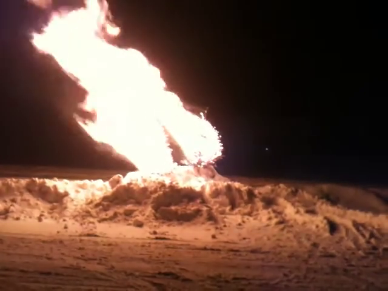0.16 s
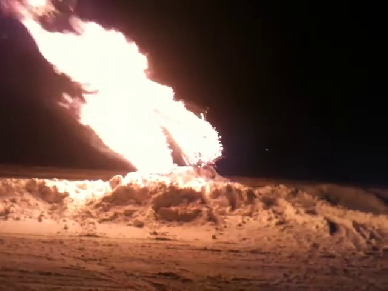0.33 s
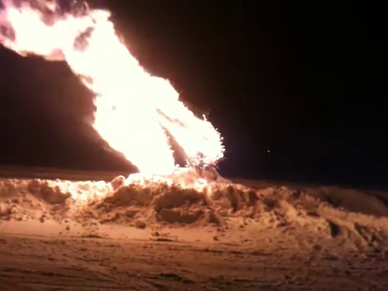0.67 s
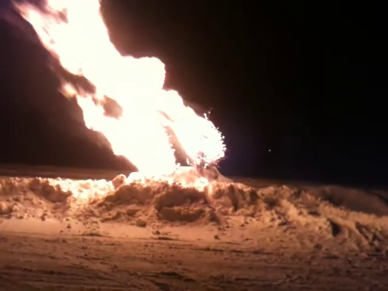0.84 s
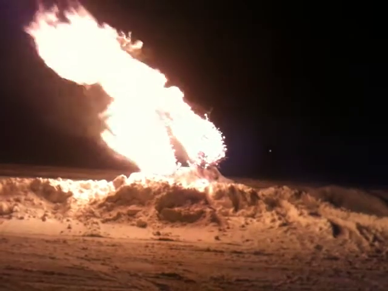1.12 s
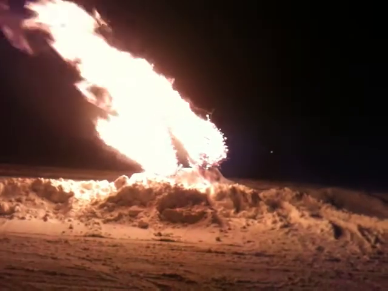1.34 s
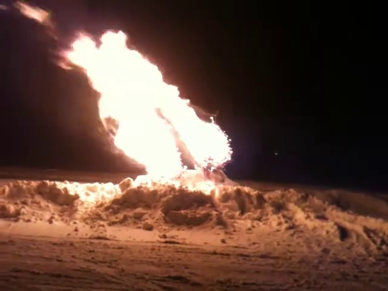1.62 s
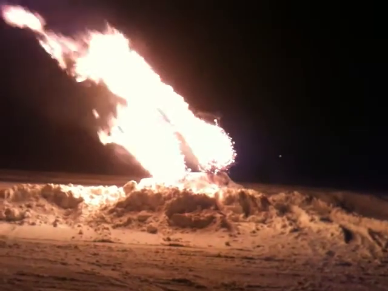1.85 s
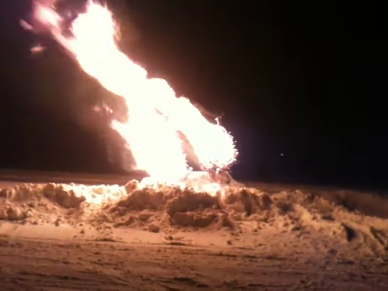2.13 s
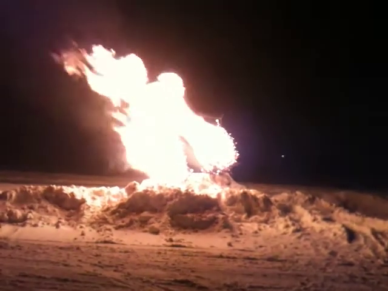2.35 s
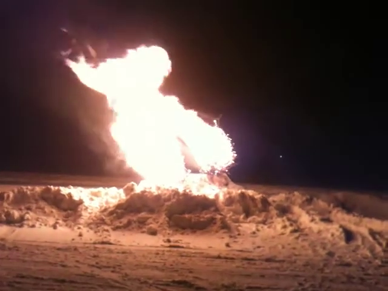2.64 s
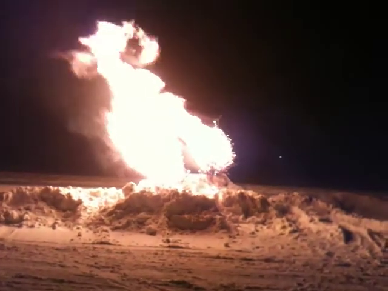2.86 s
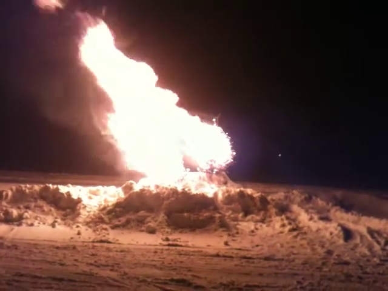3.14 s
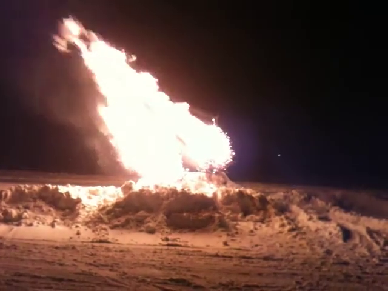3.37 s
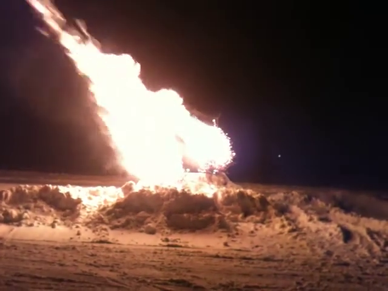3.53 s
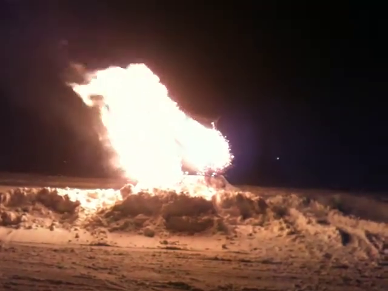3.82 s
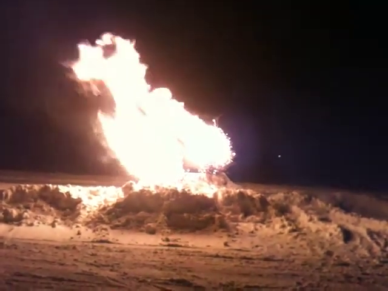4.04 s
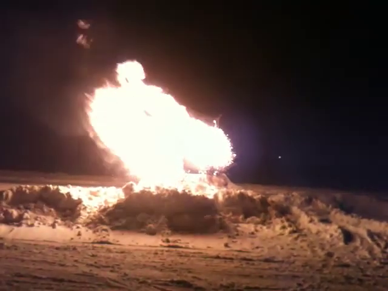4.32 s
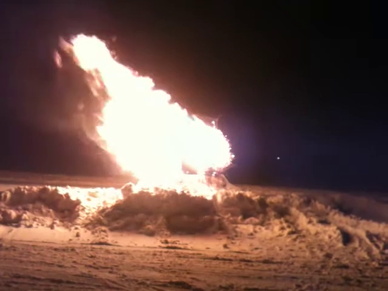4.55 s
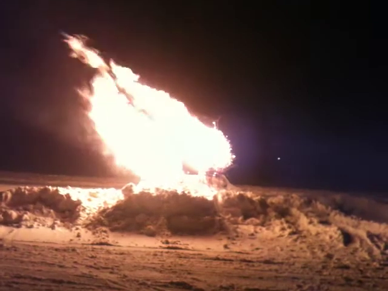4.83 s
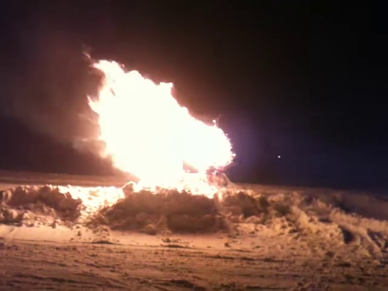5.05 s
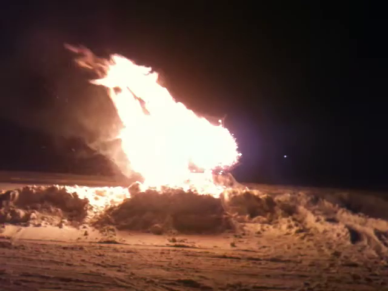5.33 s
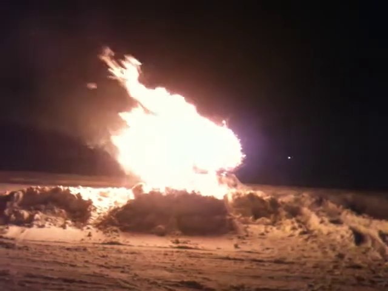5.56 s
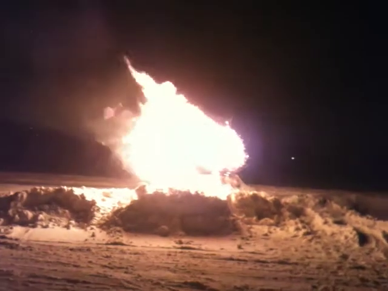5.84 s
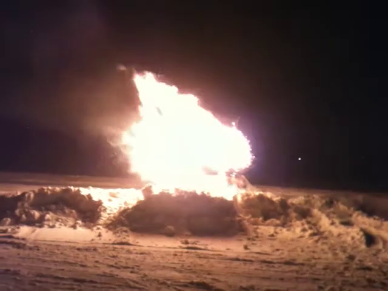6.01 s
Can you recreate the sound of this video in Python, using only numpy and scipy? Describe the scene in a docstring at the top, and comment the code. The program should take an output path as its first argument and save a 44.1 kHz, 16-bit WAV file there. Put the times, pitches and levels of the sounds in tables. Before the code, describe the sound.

A pile of conifer trees burns some way off on an open, snowy field. For the whole six seconds, the main sound is a bright, spitting sizzle of burning needles, wavering in small flurries and easing only slightly toward the end. It flares briefly at the very start and around 1.7, 4.2 and 5.4 seconds. Thin twigs snap sharply many times a second, the loudest near 0.4 seconds. Thicker branches crack with dry, woody pops, three in the opening moment and others around 1.7, 2.4, 3.2, 3.5 and 4.4 seconds. Well underneath, the flames flutter and roar softly, swelling near 0.4, 0.7, 1.7, 3 and 4.8 seconds, along with a faint, deep rumble of wind on the microphone. At about 3.6 seconds a pocket of gas flares with one soft, low puff that trails into the roar. The sound is dry and outdoors, still crackling at the end.

```python
"""A bright, spitting sizzle: a pile of conifer trees ablaze some way off, on a snowy field at night.
Needles burst by the thousand in small flurries and merge into that sizzle. Branches crack and twigs
snap out of it, each doubled by its bounce off the ground. Underneath, the flames flutter and roar
softly over a faint, deep rumble of wind on the microphone. A little past halfway a pocket of gas
flares with one low puff."""
import sys
import numpy as np
from scipy import signal
from scipy.fft import rfft, irfft, next_fast_len
from scipy.io import wavfile
from scipy.ndimage import uniform_filter1d

SR = 44100
rng = np.random.default_rng(int(sys.argv[2]) if len(sys.argv) > 2 else 0)


def transcribe(signal):
    """Save signal, clipped to [-1, 1], as a 16-bit WAV file at the path in sys.argv[1]."""
    frames = np.atleast_2d(signal).T
    limited = np.clip(frames, -1, 1)
    pcm = np.round(limited * 32767).astype(np.int16)
    wavfile.write(sys.argv[1], SR, pcm)


N = 272535

# How fiercely the needles burn. Each row: time in seconds, relative level in dB.
SIZZLE_FADER = [(0.0, -39.5), (0.28, -39.5), (0.45, -40), (0.55, -40.5), (1.0, -40.5), (1.55, -39.5),
                (1.85, -40), (2.02, -42.5), (2.12, -41), (2.3, -39), (2.85, -40), (3.33, -40.5),
                (3.45, -44), (3.54, -41.5), (4.0, -39), (4.13, -42.5), (4.22, -37.5), (4.34, -39),
                (4.5, -39.5), (4.76, -43), (4.86, -40.5), (5.37, -41.5), (5.49, -44), (5.67, -41),
                (6.0, -40), (6.18, -44.5)]
# Boughs catching all at once. Each row: start in seconds, length in seconds, lift of the sizzle in dB.
BOUGH_FLARES = [(0.023, 0.03, 5.5), (0.365, 0.095, 1), (1.645, 0.1, 2.1), (4.156, 0.046, 4.5),
                (4.27, 0.031, 2), (4.465, 0.041, 1), (5.375, 0.035, 4)]
# The bright tone of needles and twigs. Each row: frequency in Hz, gain in dB.
CRACKLE_EQ = [(60, -39), (300, -28), (900, -26), (2400, -15), (2800, -21), (3120, -14), (3380, -16),
              (3800, -8), (4250, -10.5), (4650, -8), (5200, -13.5), (6200, -3.5), (7200, 0), (8700, -3),
              (9700, -0.5), (10900, -5), (12000, -4), (13700, -11), (15100, -9.5)]

# The rides on the flames' low roar and airy rush. Each row: time in seconds, relative level in dB.
ROAR_FADER = [(0.0, -64), (0.65, -66), (1.2, -64.5), (2.5, -66), (3.45, -66), (4.1, -65), (5.5, -65),
              (6.18, -66.5)]
RUSH_FADER = [(0.0, -58), (1.17, -60), (2.16, -59.5), (3.42, -61.5), (4.59, -60.0), (4.86, -60.5),
              (5.13, -63), (6.17, -62)]
# Tongues of flame tearing off. Each row: start in seconds, length in seconds, lift of the roar in dB.
FLAME_SURGES = [(0.39, 0.08, 4.5), (0.73, 0.12, 4.6), (1.03, 0.046, 2), (1.36, 0.068, 3.5),
                (1.66, 0.093, 5), (1.86, 0.048, 2), (2.63, 0.06, 2), (2.97, 0.063, 4.5), (3.11, 0.045, 5),
                (3.96, 0.08, 1.5), (4.47, 0.05, 1), (4.8, 0.046, 4), (5.03, 0.07, -0.5), (5.65, 0.11, 3)]
# The flames' warm roar and midrange rush. Each row: frequency in Hz, gain in dB.
ROAR_EQ = [(15, -60), (40, -46), (58, -24), (85, -13.5), (130, -5.5), (175, -0.5), (230, -4.5), (330, -14),
           (600, -35)]
RUSH_EQ = [(50, -39), (150, -15), (400, -3), (640, 4), (950, -1.5), (1300, -4.5), (1750, 0.5), (2080, -8.5),
           (2450, -1.5), (2780, -10), (3100, -5.5), (3500, -12), (8000, -20.5)]
# The deep rumble of wind on the microphone. Each row: frequency in Hz, gain in dB.
WIND_EQ = [(15, 4), (45, 3), (70, 7), (130, -14)]

# Thick branches cracking. Each row: start in seconds, relative levels of the woody body and of the
# bright edge in dB, pitch in Hz, ring from 0 (dry click) to 1 (pitched tick).
BRANCH_CRACKS = [(0.0252, -47.5, -34, 2200, .2), (0.1734, -42, -36, 3200, .1), (0.2521, -45, -34, 800, .2),
                 (1.4603, -51, -34, 2500, .1), (1.7035, -48.5, -30.3, 3900, .2),
                 (2.0935, -41, -40, 4200, .75), (2.4038, -49, -34.5, 3900, .2),
                 (3.1607, -46.5, -34, 3500, .3), (3.5213, -45, -34, 2800, .25),
                 (4.3756, -42.5, -32.5, 4500, .1), (4.8962, -48.5, -41, 2900, .35),
                 (5.0545, -51, -35, 2200, .2), (5.346, -45.5, -41, 4300, .75),
                 (5.5602, -50, -37, 2300, .25), (6.1087, -48, -42, 3600, .7)]
# A crack's woody body and splintery edge. Each row: frequency in Hz, gain in dB.
WOOD_EQ = [(60, -35), (300, -12), (700, 2), (1100, 0.5), (1600, 7.5), (2400, 4), (3150, 2.5), (4400, 7),
           (5400, -1.5), (15000, -27)]
SPLINTER_EQ = [(1500, -37), (3200, -11), (4000, 1), (5200, -10), (7000, 6), (12000, -1), (15000, -12)]
# The loudest twigs snapping. Each row: start in seconds, relative level in dB, pitch in Hz, ring 0 to 1.
TWIG_SNAPS = [(0.0746, -33, 10000, .4), (0.112, -32, 9400, .4), (0.3756, -24.7, 7200, .25),
              (0.4228, -32.5, 7300, .4), (0.4377, -33.5, 8300, .3), (0.6254, -33.5, 9200, .4),
              (0.7003, -33.5, 8000, .5), (0.745, -33.5, 8300, .5), (0.8785, -34, 7500, .5),
              (0.8921, -32.2, 8700, .6), (0.9962, -33, 7900, .5), (1.0676, -33, 6600, .4),
              (1.2916, -33, 8300, .2), (1.3504, -33, 7900, .4), (1.374, -31, 8900, .5),
              (1.6578, -31, 6500, .3), (1.6755, -33, 9800, .5), (1.7001, -29.8, 6900, .2),
              (1.9101, -27.8, 9600, .4), (2.2718, -27.7, 7600, .3), (2.3568, -30.8, 9900, .2),
              (2.3843, -29.4, 9700, .6), (2.4328, -27.3, 9700, .5), (2.5402, -33, 7500, .4),
              (2.6395, -33.5, 7000, .4), (2.7548, -28, 6700, .25), (3.0206, -32.5, 10100, .4),
              (3.0325, -30.6, 9900, .35), (3.3472, -28.3, 6800, .6), (3.5848, -33, 8500, .4),
              (3.7074, -28.5, 9400, .6), (3.8867, -33, 7200, .5), (4.1262, -28, 10200, .45),
              (4.1948, -31, 7600, .6), (4.2144, -33, 7000, .3), (4.2978, -30, 7100, .45),
              (4.4749, -32.3, 7400, .5), (4.5056, -27.2, 9600, .45), (4.6918, -34, 7300, .5),
              (4.8025, -29.3, 7300, .35), (5.1051, -29.7, 9600, .45), (5.1837, -33.5, 7000, .4),
              (5.3084, -32, 7200, .4), (5.3817, -31.3, 10000, .7), (5.755, -33, 8500, .4),
              (5.841, -32, 7100, .7), (6.044, -31.5, 9200, .65), (6.074, -33, 7400, .5),
              (6.1085, -29, 7100, .9), (6.116, -34.5, 7500, .7), (6.125, -35, 7700, .5)]

GROUND_ECHO_S, GROUND_ECHO_DB = .0015, -8.5


def from_db(db):
    """Decibels to gain."""
    return 10 ** (np.asarray(db) / 20)


def rms_one(x):
    """Scale to an rms of 1."""
    return x / np.sqrt(np.mean(x ** 2) + 1e-20)


def ride(fader):
    """A fader's level in dB at every sample."""
    return np.interp(np.arange(N) / SR, *np.transpose(fader))


def swells(rows, ramp_s=0.048):
    """A bough or a tongue of flame blazes and dies back: dB on top of the steady burning."""
    t = np.arange(N) / SR
    return sum(db * np.clip(.5 + np.minimum(t - s, s + length_s - t) / ramp_s, 0, 1)
               for s, length_s, db in rows)


def equalise(x, curve):
    """Minimum-phase EQ: colours a click without smearing anything ahead of its attack."""
    size = 2 * next_fast_len(len(x))
    hz, db = np.transpose(curve)
    bins = np.maximum(np.arange(size // 2 + 1) * SR / size, 1)
    gain = from_db(np.interp(np.log(bins), np.log(hz), db))
    cepstrum = irfft(np.log(gain))
    cepstrum[1:size // 2] *= 2
    cepstrum[size // 2 + 1:] = 0
    return irfft(rfft(x, size) * np.exp(rfft(cepstrum)))[:len(x)]


def resonance(x, hz, width_hz):
    """One resonant band with a gain of 1 at its peak."""
    r = np.exp(-np.pi * width_hz / SR)
    feedback = [1, -2 * r * np.cos(2 * np.pi * hz / SR), r * r]
    return signal.lfilter(np.array([1, 0, -1]) * (1 - r * r) / 2, feedback, x + 1e-18)


def sputters(per_s, size_db, size_cap, t60):
    """The flurries in the sizzle, as a gain: sprigs catch at random, flare at once and die quickly."""
    caught = rng.random(N) < per_s / SR
    catches = caught * from_db(size_db * np.minimum(rng.exponential(1, N), size_cap))
    power_decay = from_db(-60 / (t60 * SR)) ** 2
    return np.sqrt(1 + signal.lfilter([1], [1, -power_decay], catches ** 2 + 1e-18))


def needles(flurries, per_s, size_db, size_cap, width_hz, click_share, hiss_db, pitches=24):
    """Resin pockets burst, each a click with a brief high ring; together they sizzle."""
    born = rng.random(N) < per_s / SR
    sizes = from_db(size_db * np.minimum(rng.exponential(1, N), size_cap))
    bursts = born * flurries * sizes * rng.choice([-1, 1], N)
    pitch_index = rng.integers(0, pitches, N)
    # bursts at all heights of the pile: every ground echo has its own delay
    echo_at = np.arange(N) + (GROUND_ECHO_S * SR * rng.uniform(.5, 2, N)).astype(int)
    crackle = np.zeros(N)
    for k, hz in enumerate(np.linspace(3500, 15500, pitches)):
        clicks = bursts * (pitch_index == k)
        clicks = clicks + from_db(GROUND_ECHO_DB) * np.bincount(echo_at, clicks)[:N]
        crackle += resonance(clicks, hz, width_hz) + click_share * clicks
    # bursts deep in the pile blur into hiss
    hiss = from_db(hiss_db) * flurries * rng.standard_normal(N)
    return rms_one(equalise(rms_one(crackle) + hiss, CRACKLE_EQ))


def flutter(rate_hz, hop=40, settle=2000):
    """A smooth random wobble with an rms of 1, moving about `rate_hz` times a second."""
    r = np.exp(-2 * np.pi * rate_hz * hop / SR)
    noise = rng.standard_normal(N // hop + settle + 2)
    slow = signal.lfilter([1], [1, -2 * r, r * r], noise)[settle:]
    return np.interp(np.arange(N) / hop, np.arange(len(slow)), rms_one(slow))


def turbulence(curve, flutter_db, flutter_hz):
    """Churning gas or air: an even bed of noise that flutters in level."""
    noise = equalise(rng.standard_normal(N), curve)
    even = noise / np.sqrt(uniform_filter1d(noise ** 2, SR // 10) + 1e-20)
    return rms_one(even * from_db(flutter_db * flutter(flutter_hz)))


def flames(surge_db):
    """Turbulent burning gas: a low roar that surges, and a quicker, fluttering rush above it."""
    roar = turbulence(ROAR_EQ, flutter_db=1.25, flutter_hz=7.4)
    rush = turbulence(RUSH_EQ, flutter_db=1.6, flutter_hz=21)
    return from_db(ride(ROAR_FADER) + surge_db + 2) * roar + from_db(ride(RUSH_FADER) - 0.05) * rush


def wind(gust_db):
    """Wind buffets the microphone: a faint, deep, gusty rumble."""
    return from_db(-81 + gust_db) * turbulence(WIND_EQ, flutter_db=1.0, flutter_hz=2.6)


def ground_bounce(x):
    """The snow returns a crack a moment later, the later the higher up it happens."""
    at = np.arange(len(x))
    delay = GROUND_ECHO_S * rng.uniform(.8, 1.2) * SR
    return x + from_db(GROUND_ECHO_DB) * np.interp(at - delay, at, x, left=0)


def fracture(spray_db, spray_t60, size=2048):
    """Wood breaks with one sharp click and a fading spray of splinters."""
    blow = from_db(spray_db - 60 * np.arange(size) / SR / spray_t60) * rng.standard_normal(size)
    blow[0] = 1
    return ground_bounce(blow)


def ringing(blow, hz, width_hz, ring):
    """Part of a blow comes out dry, part rings in the wood."""
    return (1 - ring) * blow + 3 * ring * resonance(blow, hz, width_hz)


def place(out, s, sound, level_db):
    """Drop a hit in at s seconds, with its loudest 1.5 ms at the given level."""
    start = int(s * SR)
    part = sound[:N - start]
    loudest = np.sqrt(uniform_filter1d(sound ** 2, 66, mode="constant").max())
    out[start:start + len(part)] += from_db(level_db) * part / loudest


def branches(edge_trim_db, width_hz):
    """A thick branch cracks with a dry, woody pop and a bright edge of splinters."""
    out = np.zeros(N)
    for s, body_db, edge_db, hz, ring in BRANCH_CRACKS:
        pop = ringing(fracture(spray_db=-17, spray_t60=0.012), hz, width_hz, ring)
        edge = fracture(spray_db=-14, spray_t60=0.011)
        place(out, s, equalise(pop, WOOD_EQ), body_db)
        place(out, s, equalise(edge, SPLINTER_EQ), edge_db + edge_trim_db)
    return out


def small_twigs(sizzle_db, per_s, lift_db, spread_db, hz, spread_hz, count=200):
    """Lesser twigs go at random, as loud as the blaze is fierce: rows laid out like TWIG_SNAPS."""
    times = np.cumsum(rng.exponential(1, count)) / per_s
    scatter = rng.standard_normal((count, 2))
    return [(s, sizzle_db[int(s * SR)] + lift_db - spread_db * softer, hz + spread_hz * higher, ring)
            for s, (softer, higher), ring in zip(times, scatter, rng.random(count)) if s < N / SR]


def twigs(snaps, trim_db, width_hz, tear_db, tear_s):
    """A thin twig snaps with a spray of splinters, rings high and tears through a moment later."""
    out = np.zeros(N)
    for s, snap_db, hz, ring in snaps:
        blow = fracture(spray_db=-19.5, spray_t60=0.017)
        snap = equalise(ringing(blow, hz, width_hz, ring), CRACKLE_EQ)
        place(out, s, snap, snap_db + trim_db)
        place(out, s + tear_s * (.5 + rng.random()), snap, snap_db + tear_db)
    return out


def puff(s, hz, sag_hz_per_s, swell_s, tail_db, tail_t60, width_hz):
    """A pocket of gas flares with a soft thump that sinks in pitch and trails off into the roar."""
    age = np.arange(N) / SR - s
    thump = np.exp(-(age / swell_s) ** 2) * np.sin(2 * np.pi * (hz - sag_hz_per_s * age / 2) * age)
    band = resonance(rng.standard_normal(N), hz, width_hz)
    burning = rms_one(resonance(band, hz, width_hz))
    tail = burning * np.clip(age / swell_s, 0, 1) * from_db(tail_db - 60 * np.abs(age) / tail_t60)
    return thump + tail


def scene():
    """The mono mix: sizzle, cracks and snaps up front, over a soft bed of flame and wind."""
    sizzle_db, surge_db = ride(SIZZLE_FADER), swells(FLAME_SURGES)
    flurries = sputters(per_s=150, size_db=6.0, size_cap=0.95, t60=0.025)
    sizzle = from_db(sizzle_db + swells(BOUGH_FLARES) + 0.84) * needles(
        flurries, per_s=6200, size_db=3.5, size_cap=2.83, width_hz=1200, click_share=0.19, hiss_db=-6)
    bed = flames(surge_db) + wind(gust_db=1.4 * surge_db)  # gusts and roar swell together
    cracks = branches(edge_trim_db=-0.3, width_hz=1200)
    small_snaps = small_twigs(sizzle_db, per_s=16, lift_db=1.5, spread_db=0.4, hz=8450, spread_hz=1140)
    snaps = twigs(TWIG_SNAPS + small_snaps, trim_db=-0.4, width_hz=1150, tear_db=-17.5, tear_s=0.0011)
    thump = from_db(-49.5) * puff(
        s=3.633, hz=259, sag_hz_per_s=3900, swell_s=0.0076, tail_db=-18, tail_t60=1.8, width_hz=51)
    return (sizzle + bed + cracks + snaps + thump)[None]


def record(dry):
    """A steep low-pass takes off the very top of the treble."""
    cutoff_hz = 15720
    return signal.sosfilt(signal.ellip(12, .1, 80, cutoff_hz, fs=SR, output="sos"), dry)


dry = scene()
out = record(dry)
transcribe(out)
```